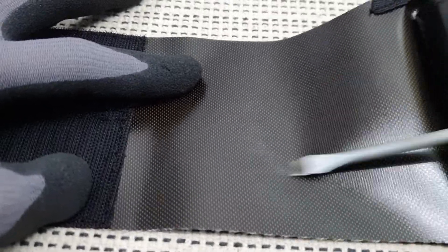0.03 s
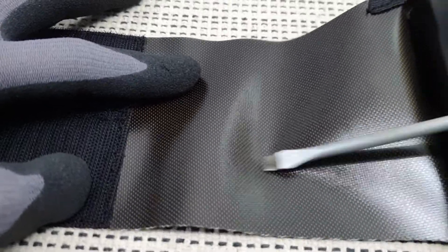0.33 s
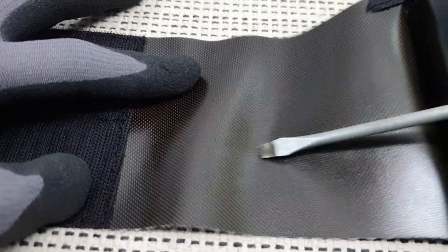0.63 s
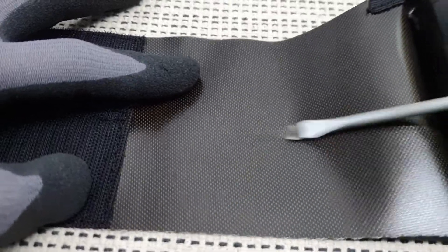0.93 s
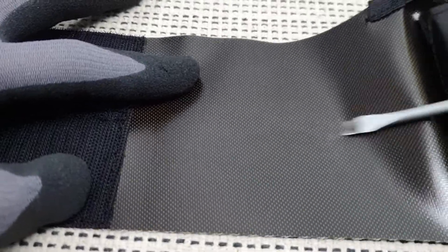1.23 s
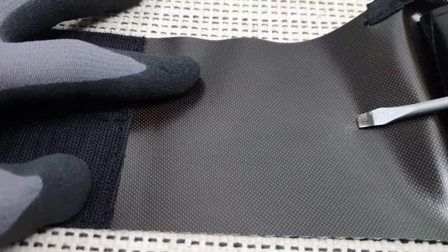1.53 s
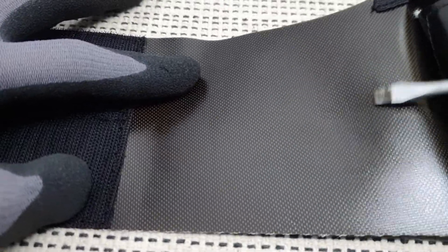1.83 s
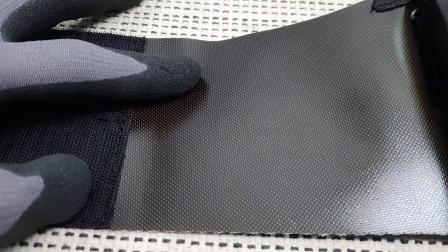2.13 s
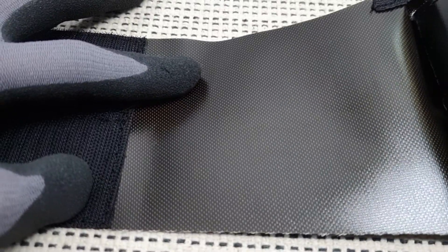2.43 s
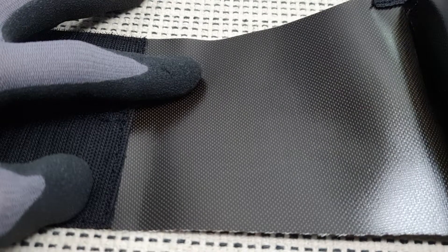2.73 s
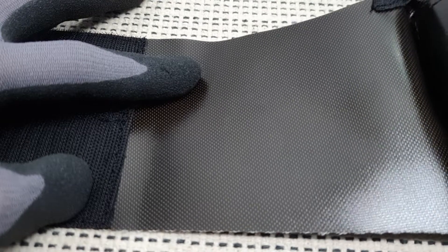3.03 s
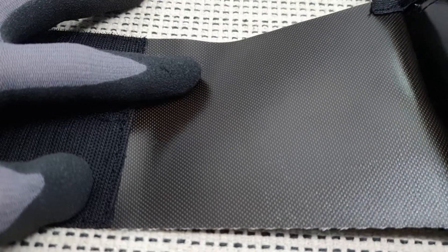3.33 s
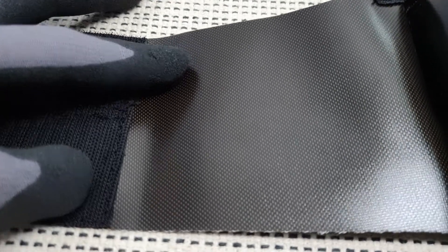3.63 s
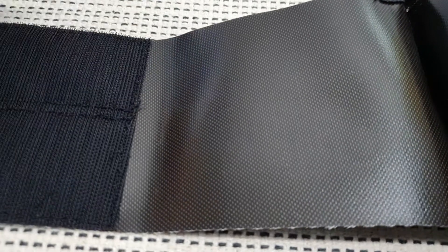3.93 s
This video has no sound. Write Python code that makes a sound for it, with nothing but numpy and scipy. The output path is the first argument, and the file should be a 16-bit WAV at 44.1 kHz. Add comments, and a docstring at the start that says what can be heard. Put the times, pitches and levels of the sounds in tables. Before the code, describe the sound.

Close up in a quiet room with a low hum, a screwdriver scrubs rhythmically across coated fabric on a table, rasping and ticking over the weave. The scraping stops, light glove rustling follows, then two soft thumps with brief crackles.

```python
"""Small quiet room, close up, low hum. A screwdriver tip scrubs over coated fabric on a table: seven hard
pushes, each with a light return. The tip bumps over the weave, faster in mid-stroke, and snags now and
then; the table booms with it. Cloth hisses, tool and coating click, a faint whistle comes and goes.
From 1.8 s gloves and fabric rustle as the tool is taken away. Near 3.05 s and 3.46 s two soft thumps
shake the table and ring its modes, each with a short crackling rattle."""
import sys
import numpy as np
from scipy import signal
from scipy.fft import rfft, irfft, next_fast_len
from scipy.io import wavfile
from scipy.ndimage import map_coordinates

SR = 44100
rng = np.random.default_rng(int(sys.argv[2]) if len(sys.argv) > 2 else 0)


def put_to_file(sound):
    """Save the sound as 16-bit audio at rate SR, in the file named by the first command-line argument."""
    columns = np.atleast_2d(sound).T  # one column per channel
    safe = np.clip(columns, -1, 1)
    whole_steps = np.round(safe * 32767)
    wavfile.write(sys.argv[1], SR, whole_steps.astype(np.int16))


N = 176400

# strokes: t/s, length/s, weave f/Hz at top speed, level/dB, grit/dB, lift of every third harmonic/dB
PUSHES = [(-.024, 0.11, 166.7, -23, 8, 13.5), (0.245, 0.12, 144.7, -19, 2.5, -1.5),
          (.508, .115, 103.1, -19.5, -4.5, -0.5), (0.773, .105, 100.8, -22.5, 2.5, 4),
          (1.027, .122, 125.3, -23.5, 6.5, 3.5), (1.281, 0.12, 152.3, -19, 3.5, 4.5),
          (1.542, 0.12, 151.1, -24.5, 4, 1)]
RETURNS = [(.106, 0.12, 139.1, -32.5, -13, 5), (.381, 0.12, 109.5, -35, -21.5, 10),
           (.632, .118, 117.3, -44.5, 2, 10), (.897, 0.13, 131.6, -36, -0.5, 7),
           (1.148, .122, 169.6, -32, 6, 1), (1.41, .13, 145.3, -32.5, 5, -1.5),
           (1.665, 0.11, 116.4, -41, -0.5, 3.5)]
# weave ripple: level/dB of harmonics 1, 2, 3 ...
PUSH_RIPPLE_DB = [-3, -6, 0, -6, -2, -9, -9.5, -5.5, -21]
RETURN_RIPPLE_DB = [-2.5, -9, 2, -5, -3, 3.5, 0.5, -22, -1]
TABLE_RESPONSE = [(25, -34), (38, -18), (50, 3), (80, 0), (150, 2.5), (225, -2), (300, -6.5), (460, -14),
                  (610, -23.5), (780, -22), (1100, -28.5), (1500, -27.5), (3000, -44), (6000, -53.5),
                  (15000, -79)]  # table under the tip: f/Hz, gain/dB
SCRAPE_BALANCE = [(60, 1.5), (180, 1), (550, -3), (1500, 1)]  # f/Hz, left-right/dB
SWAY_LEVEL = [(0, -42), (.75, -35), (1.05, -47.5), (1.72, -38), (1.85, -57), (4, -75)]  # table under the hand: t/s, level/dB
SWAY_COLOUR = [(20, -27.5), (38, -9.5), (54, 3), (75, 3.5), (100, 7), (150, -32), (290, -8.5), (450, -36),
               (1000, -62.5)]  # f/Hz, gain/dB
DRONE_LEVEL = [(0, -39), (.85, -34.5), (1, -44.5), (1.55, -43.5), (1.9, -60)]  # low tone: t/s, level/dB
RUB_LEVEL = [(0, -43.5), (.5, -46.5), (1, -46), (1.7, -47), (1.95, -49.5), (2.5, -50.5), (2.75, -49),
             (3.1, -49.5), (3.25, -54), (3.6, -53), (4, -59.5)]  # cloth hiss: t/s, level/dB
RUB_COLOUR = [(200, 17.5), (700, 5), (1800, -2), (3200, -1.5), (4500, -9), (7000, -13.5), (8500, -19.5),
              (11000, -20.5), (12200, -33), (15500, -44.5)]  # f/Hz, gain/dB
FLOOR_COLOUR = [(20, -29.5), (59, 2), (76, 1.5), (109, 4), (140, -24), (202, -9.5), (372, -11.5),
                (725, -18.5), (1400, -20), (3350, -29.5), (15500, -52.5)]  # room noise: f/Hz, gain/dB
HUM_TONES = [(26.9, -61), (53.8, -52), (107.7, -76.5), (312, -61.5)]  # f/Hz, level/dB
CLICKS = [(0.043, -18.5, 2030, -4), (0.266, -25.5, 1310, 5), (.827, -28.5, 1360, -3),
          (1.339, -31, 2000, -6), (2.81, -32, 2180, -1), (2.96, -36, 1480, 2), (3.036, -31.5, 4460, -2),
          (3.049, -30, 2930, 4), (3.048, -15, 900, -4), (3.0625, -30, 5560, 2), (3.0652, -29.5, 4930, -1),
          (3.462, -39.5, 4040, 2), (3.63, -41.5, 6600, 0)]  # tool and coating: t/s, level/dB, f/Hz, left-right/dB
# glove and fabric rustles, plus the thumps' crackling rattle at 3.062 s and 3.466 s:
# peak t/s, rise/s, fall/s, level/dB, treble tilt/(dB/oct), left-right/dB
RUSTLES_AND_RATTLES = [(.16, 0.14, 0.092, -64, 19, -10), (.93, 0.44, 0.26, -53.5, -3.5, -3.5),
                       (1.236, 0.036, 0.024, -44, -1, -6), (1.315, 0.058, 0.06, -53.5, 0, -7),
                       (1.484, 0.048, 0.056, -45, 0.5, -4), (1.584, 0.027, 0.034, -42.5, -2.5, -2),
                       (1.78, 0.05, 0.094, -47.5, 0, -4), (1.87, .05, .055, -69, 8, -1),
                       (2.152, 0.088, 0.083, -61.5, 0.5, -3), (2.385, 0.087, 0.07, -57, 2.5, -4.5),
                       (2.57, 0.082, 0.07, -50.5, -0.5, -5.5), (2.68, 0.054, 0.035, -56, 15, -13),
                       (2.708, 0.019, .01, -46, 0.5, -8), (2.86, 0.086, 0.043, -50, -2.5, -3),
                       (3.019, 0.061, 0.13, -49, -3, -8), (3.062, 0.0076, 0.051, -37.5, -11, 9),
                       (3.466, .004, 0.038, -44, -9, 2), (3.711, 0.012, 0.019, -53, 0, 6.5),
                       (3.738, 0.026, 0.058, -48, 2.5, 1), (3.845, 0.032, 0.045, -63, 1.5, 6)]
GRAIN_COLOUR = [(300, 5.5), (1200, 8.5), (3000, 7.5), (5500, 3), (8000, -2), (11000, -3), (13000, -7),
                (15500, -9)]  # f/Hz, gain/dB
WHISTLE_TRACK = [(.2, 10200, -91), (.45, 10030, -75), (.65, 10030, -71), (.93, 9850, -66.5),
                 (1.08, 10050, -78), (1.2, 10000, -91)]  # t/s, f/Hz, level/dB
SNAGS = [(0.253, -27), (0.265, -23.5), (.329, -22.5), (.540, -24.5), (0.588, -24.5), (.828, -16),
         (1.045, -41), (1.299, -35), (1.374, -20.5), (1.598, -17)]  # tip in the coating: t/s, level/dB
# blows on the table: t/s, level/dB, high-pass f/Hz, low-pass f/Hz, ring/dB, ring corner f/Hz, t60 factor
BLOWS = [(3.0358, -17.5, 250, 1520, -9.5, 1500, 1), (3.0467, -0.5, 130, 1200, -5, 1400, 1),
         (3.057, -12.5, 69.4, 603, -6, 605, 1), (3.4592, -3, 60, 300, -2.5, 210, 0.69)]
TABLE_MODES = [(78.6, -1.5, 0.11), (89.45, -15, 0.8), (149.6, -5.5, 0.22), (176.7, -3.5, 0.12),
               (268, -11, 0.15), (290.6, -7, 0.24), (356, -17.5, 0.25), (441, -27, 0.16), (747, -4, 0.048),
               (943, -3.5, 0.046), (1128, -19.5, 0.19)]  # f/Hz, level/dB, t60/s
THUD_COLOUR = [(30, -23), (100, 9), (220, 11), (400, 13), (580, -6.5), (900, -4), (1400, -16),
               (3000, -11.5), (8000, -34)]  # f/Hz, gain/dB
BLOW_BALANCE = [(60, -1), (300, -1.5), (600, 3), (1200, -1), (3000, -7)]  # f/Hz, left-right/dB
STEREO_COHERENCE = [(60, 0.98), (300, 0.78), (600, 0.033), (1200, 0), (2500, 0), (12000, 0)]  # f/Hz, left-right correlation
ROOM_DECAY = [(80, 0.45), (400, 0.14), (2000, 0.34), (12000, 0.061)]  # f/Hz, t60/s

TOP_HZ = 15800


def amp(db):
    """Decibels to gain."""
    return 10 ** (np.asarray(db) / 20)


def unit(x):
    """Scale to rms 1."""
    return x / np.sqrt(np.mean(x ** 2) + 1e-20)


def along(points, hz):
    """Interpolate (f/Hz, value) points on a log axis."""
    f, v = np.transpose(points)
    return np.interp(np.log(hz + 1), np.log(f + 1), v)


def clock():
    """t/s of each sample."""
    return np.arange(N) / SR


def curves(rows):
    """Per-sample curve for each column after t/s."""
    s, *cols = np.transpose(rows)
    return [np.interp(clock(), s, c) for c in cols]


def wobble(rate_hz):
    """Smooth random curve with knots at rate_hz."""
    return map_coordinates(rng.standard_normal(8192), [clock() * rate_hz], mode="wrap")


def filtered(x, response):
    """Apply the gain response(hz)."""
    n = x.shape[-1]
    m = next_fast_len(n + 8192)
    return irfft(rfft(x, m) * response(np.fft.rfftfreq(m, 1 / SR)), m)[..., :n]


def butter(x, order, hz, kind):
    """Causal low-, high- or band-pass."""
    return signal.sosfilt(signal.butter(order, hz, kind, fs=SR, output="sos"), x)


def impulse(colour, size=8192):
    """Minimum-phase impulse response of energy 1."""
    cepstrum = irfft(np.log(amp(along(colour, np.fft.rfftfreq(size, 1 / SR)))))
    cepstrum[1:size // 2] *= 2
    cepstrum[size // 2 + 1:] = 0
    h = irfft(np.exp(rfft(cepstrum)))
    return h / np.linalg.norm(h)


def spread(pair):
    """Two unrelated signals to stereo: bass central, treble wide."""
    turn = lambda hz: np.arccos(np.clip(along(STEREO_COHERENCE, hz), -1, 1)) / 2
    mid, side = filtered(pair, lambda hz: np.array([np.cos(turn(hz)), np.sin(turn(hz))]))
    return np.array([mid + side, mid - side])


def noise(colour):
    """Coloured stereo noise of rms 1."""
    return unit(filtered(spread(rng.standard_normal((2, N))), lambda hz: amp(along(colour, hz))))


def pan(db):
    """Left and right gains."""
    return amp(np.array([[db], [-db]]) / 2)


def balance(x, points):
    """Pan by frequency."""
    return filtered(x, lambda hz: amp(along(points, hz) * np.array([[.5], [-.5]])))


def add(out, s, x):
    """Mix x into out at time s."""
    part = out[..., max(round(s * SR), 0):][..., :x.shape[-1]]
    part += x[..., :part.shape[-1]]


def room(x, wet_db):
    """Add the room's short tail."""
    hz, t, spectra = signal.stft(rng.standard_normal((2, SR // 2)), SR, nperseg=256)
    decay = amp(-60 * t / along(ROOM_DECAY, hz)[:, None])
    tail = spread(signal.istft(spectra * decay, SR, nperseg=256)[1])
    return x + amp(wet_db) * signal.fftconvolve(x, tail / np.linalg.norm(tail[0]), axes=1)[:, :N]


def arch(start_s, length_s, skew=1):
    """Half sine: the hand speeds up and slows; skew > 1 peaks later."""
    u = (clock() - start_s) / length_s
    inside, out = (u > 0) & (u < 1), np.zeros(N)
    out[inside] = np.abs(np.sin(np.pi * u[inside] ** skew))
    return out


def rasp(grit, catches_per_s=900, scatter_db=6, gain_db=-4.5):
    """Random catches of the tip, heard through the table."""
    catches = (rng.random((2, N)) < catches_per_s / SR) * amp(scatter_db * rng.standard_normal((2, N)))
    catches *= rng.choice([-1, 1], (2, N))
    drive = spread(unit(catches)) * grit
    body = signal.fftconvolve(drive, impulse(TABLE_RESPONSE)[None], axes=1)[:, :N]
    return amp(gain_db) * butter(body, 1, 130, "high")


def strokes(rows, ripple_db, wander=0.014, flutter_db=1.8):
    """The tip rides the weave: speed sets pitch; grit adds rasp and brightens the ripple."""
    pitch_hz, force, grit, tilt_db_oct, third_db = np.zeros((5, N))
    for start_s, length_s, hz, db, grit_db, lift_db in rows:
        swing = arch(start_s, length_s)
        pitch_hz = np.maximum(pitch_hz, hz * arch(start_s, length_s, skew=1.15) ** 0.55)
        force += amp(db) * swing ** 1.06
        grit += amp(db + grit_db) * swing ** 3.7
        tilt_db_oct += 0.24 * grit_db * swing
        third_db += lift_db * np.sqrt(swing)
    phase = 2 * np.pi * np.cumsum(pitch_hz * (1 + wander * wobble(90))) / SR
    ripple = np.zeros(N)
    for k, db in enumerate(ripple_db, 1):
        drive_db = db + tilt_db_oct * np.log2(k) + third_db * (k % 3 == 0) + flutter_db * wobble(70)
        table_db = along(TABLE_RESPONSE, k * pitch_hz)
        ripple += amp(drive_db + table_db) * np.sin(k * phase + rng.uniform(0, 2 * np.pi))
    return force * ripple + rasp(grit)


def cloth_hiss(stroke_lift_db=3.5):
    """Rubbing cloth hisses, more with hand speed."""
    speed = sum(arch(start_s, length_s) for start_s, length_s, *_ in PUSHES + RETURNS)
    return amp(curves(RUB_LEVEL)[0] + stroke_lift_db * speed + wobble(44.2)) * noise(RUB_COLOUR)


def drone(hz=55.2):
    """Low tone, strongest under the strokes."""
    phase = 2 * np.pi * hz * clock() + 0.55 * wobble(4)
    return amp(curves(DRONE_LEVEL)[0]) * np.sqrt(2) * np.sin(phase)


def table_sway():
    """The table rumbles as it sways under the hand."""
    return amp(curves(SWAY_LEVEL)[0]) * noise(SWAY_COLOUR)


def background(floor_db=-49.5):
    """Low room noise and slightly unsteady hum."""
    hum = sum(amp(db) * np.sqrt(2) * np.sin(2 * np.pi * hz * clock() + 0.29 * wobble(1.8))
              for hz, db in HUM_TONES)
    return amp(floor_db) * noise(FLOOR_COLOUR) + hum


def clicks(t60_s=0.014, band_oct=(-1.3, 0.75), gain_db=10):
    """Tool and coating snap: noise bursts, each in its own band."""
    out, t = np.zeros((2, N)), clock()[:4096]
    for s, db, hz, side_db in CLICKS:
        edges_hz = np.minimum(hz * 2 ** np.array(band_oct), [SR / 3, TOP_HZ])
        burst = rng.standard_normal((2, len(t))) * amp(-60 * t / t60_s)
        snap = butter(burst, 2, edges_hz, "band")
        add(out, s, amp(db + gain_db) * snap / np.linalg.norm(snap[0]) * pan(side_db))
    return room(out, wet_db=-13)


def rustles_and_rattles(grain_db=1.5, flutter_db=0.75):
    """Grainy swells: glove and fabric rustles, plus a short crackling rattle after each thump."""
    out, t = np.zeros((2, N)), clock()
    grains = unit(noise(GRAIN_COLOUR) * amp(grain_db * wobble(700) + flutter_db * wobble(60)))
    for peak_s, rise_s, fall_s, db, tilt_db_oct, side_db in RUSTLES_AND_RATTLES:
        span = (t > peak_s - 3 * rise_s) & (t < peak_s + 3 * fall_s)
        lag_s = t[span] - peak_s
        swell = np.exp(-1.6 * np.abs(lag_s / np.where(lag_s < 0, rise_s, fall_s)) ** 1.17)
        tilt = lambda hz: amp(tilt_db_oct * np.log2(np.maximum(hz, 1000) / 1000))
        texture = unit(filtered(grains[:, span], tilt))
        add(out, t[span][0], amp(db) * swell * texture * pan(side_db))
    return out


def whistle(width_hz=280):
    """Faint narrow noise band near 10 kHz; sinks slightly during the first strokes."""
    hz, db = curves(WHISTLE_TRACK)
    fuzz = wobble(width_hz) + 1j * wobble(width_hz)
    tone = unit(np.real(fuzz * np.exp(2j * np.pi * np.cumsum(hz) / SR)))
    gate = db > db[-1]
    return amp(db) * gate * tone * pan(5.5)


def snags():
    """The tip hangs in the coating and jumps free with a tick through the table."""
    out = np.zeros((2, N))
    tick = butter(impulse(TABLE_RESPONSE), 2, 142, "high")
    for s, db in SNAGS:
        add(out, s, amp(db) * tick / np.abs(tick).max())
    return out


def thumps(heave_hz=104.3, heave_t60_s=0.052, thud_t60_s=0.064, attack_s=0.0009):
    """Each blow heaves the table top, thuds and rings it; softer contact favours the low modes."""
    out, t = np.zeros((2, N)), clock()[:SR]
    heave = amp(1.5 - 60 * t / heave_t60_s) * np.sin(2 * np.pi * heave_hz * t)
    thud_decay = amp(-60 * t / thud_t60_s)
    for s, db, low_hz, high_hz, ring_db, corner_hz, sustain in BLOWS:
        ring = np.zeros(SR)
        for hz, mode_db, t60_s in TABLE_MODES:
            drive = amp(mode_db + ring_db) / np.hypot(1, (hz / corner_hz) ** 2)
            ring += drive * amp(-60 * t / (sustain * t60_s)) * np.sin(2 * np.pi * hz * t)
        thud = noise(THUD_COLOUR)[:, :SR] * thud_decay
        thud *= amp(-2) * np.linalg.norm(thud_decay) / np.linalg.norm(thud[0])
        blow = (thud - heave - ring) * (1 - np.exp(-t / attack_s))
        blow = butter(blow, 1, low_hz, "high")
        add(out, s, amp(db) * butter(blow, 2, high_hz, "low"))
    out = butter(out, 4, 43.3, "high")
    return balance(room(out, wet_db=-13), BLOW_BALANCE)


def scene():
    """Everything on and around the table."""
    tip = strokes(PUSHES, PUSH_RIPPLE_DB) + strokes(RETURNS, RETURN_RIPPLE_DB) + snags()
    scraping = balance(room(tip, wet_db=-12.5), SCRAPE_BALANCE)
    beds = cloth_hiss() + drone() + table_sway() + background()
    return scraping + beds + clicks() + rustles_and_rattles() + whistle() + thumps()


def record(dry):
    """Soft peak limit, fade-in, band limit."""
    ceiling, fade_s = 0.97, 0.00066
    limited = dry / (1 + np.abs(dry / ceiling) ** 6) ** (1 / 6)
    return filtered(limited * np.minimum(clock() / fade_s, 1), lambda hz: hz < TOP_HZ)


dry = scene()
out = record(dry)
put_to_file(out)
```